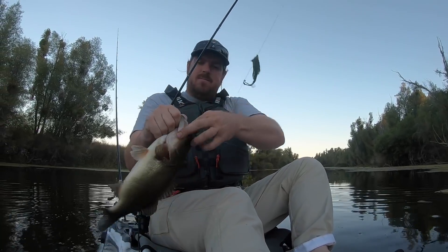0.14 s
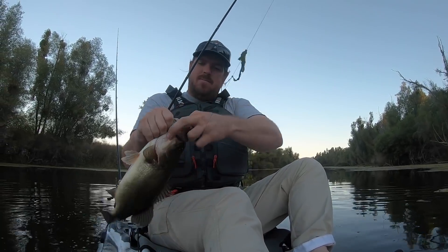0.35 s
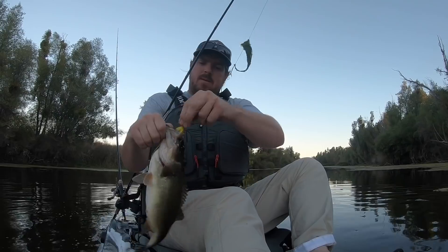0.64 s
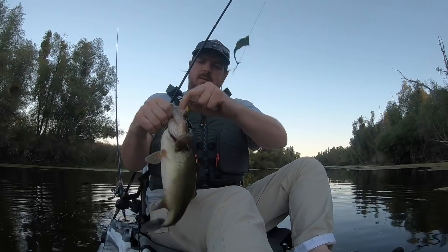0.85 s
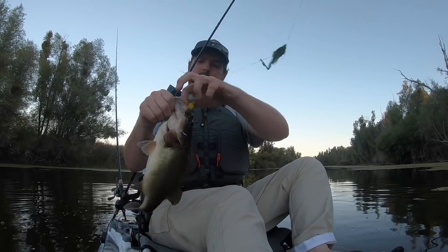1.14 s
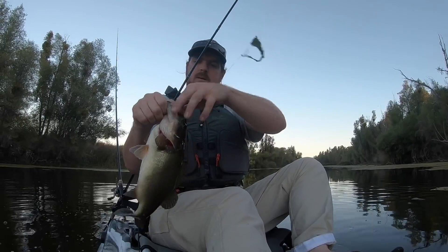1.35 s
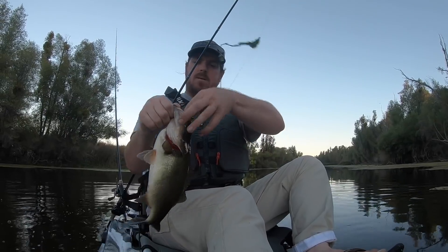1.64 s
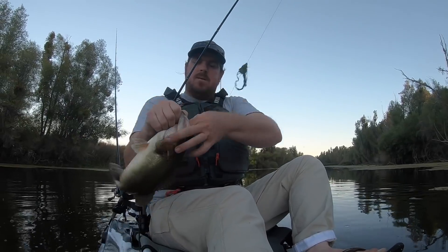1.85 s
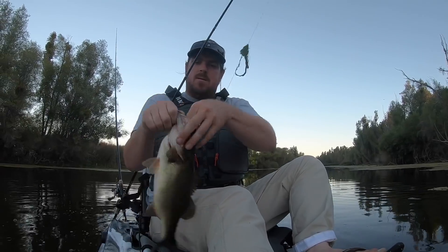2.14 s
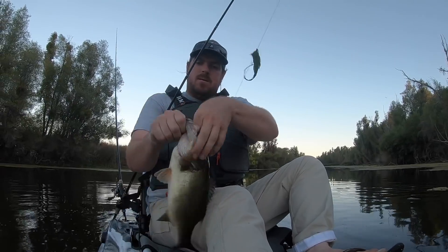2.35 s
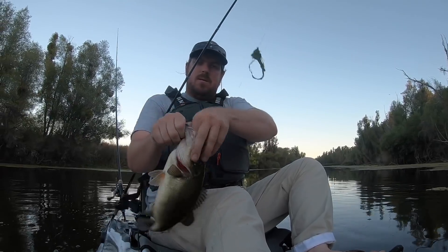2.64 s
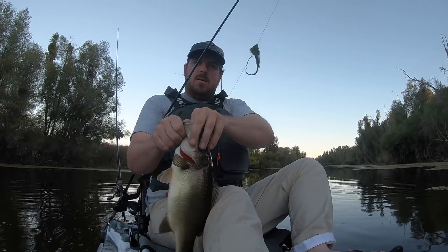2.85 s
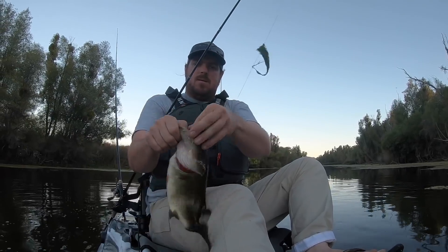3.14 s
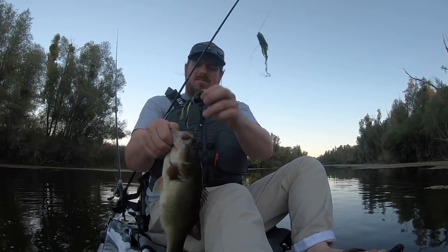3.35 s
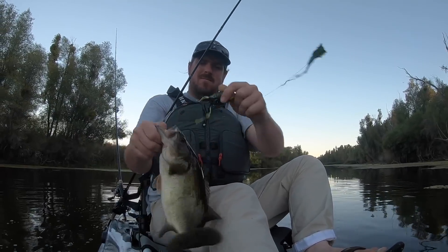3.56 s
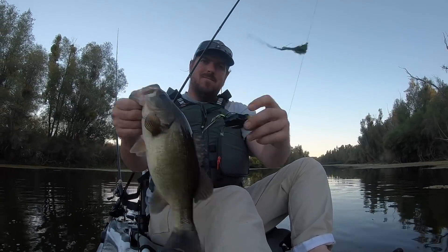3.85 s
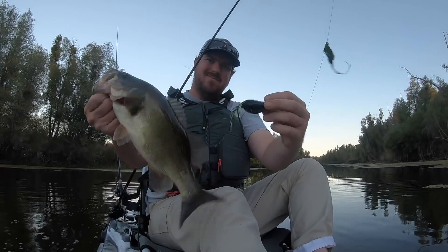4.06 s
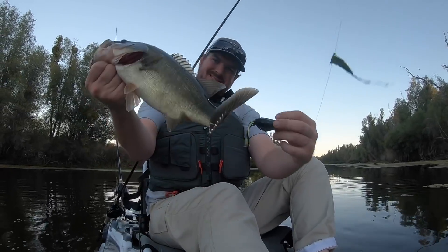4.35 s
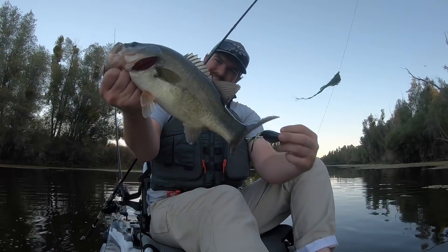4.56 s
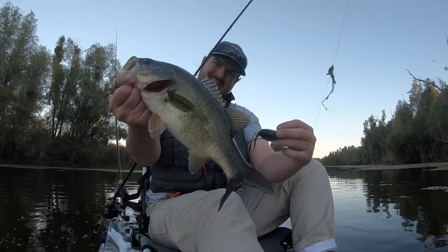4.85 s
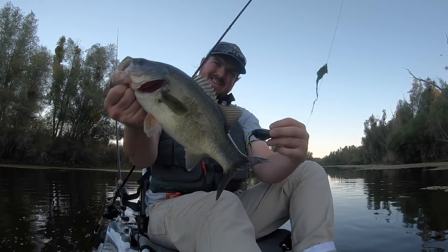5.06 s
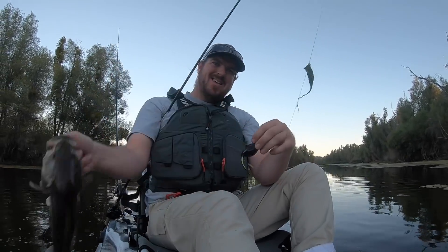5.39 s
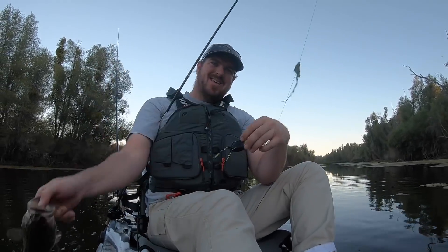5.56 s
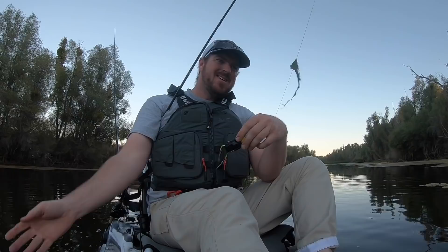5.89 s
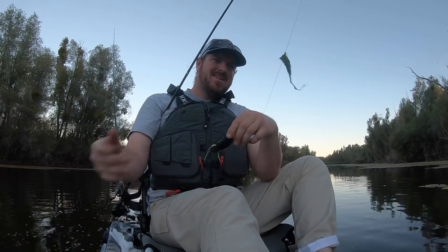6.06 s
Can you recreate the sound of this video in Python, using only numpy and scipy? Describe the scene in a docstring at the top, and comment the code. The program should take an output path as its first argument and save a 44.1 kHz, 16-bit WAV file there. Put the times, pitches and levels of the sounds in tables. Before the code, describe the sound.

On still water, a very low murmur and faint cloth rustle open, with tiny clicks, a brief falling squeak and a thin bird whistle. Then a hard hull knock and judder, scrapes, hollow taps and metallic lure clicks as a fish is unhooked. A calmer stretch with soft bumps and bird calls follows, then another cluster of heavy knocks and a short bubbling splash. Close microphone mounted on the hull, outdoors.

```python
"""A fish is unhooked in a plastic kayak on still water, close to a camera mounted on the hull.
Over a low murmur (coloured noise), faint clicks (noise bursts), cloth and wet hands (tiny slips) come first,
with a falling squeak (harmonics) and a small bird on the bank (gliding sines), which goes on calling.
Scrapes and rattles follow as hook and lure work loose; the hull knocks and judders (ringing modes, stick-slip).
After more knocks and judders the fish is let go with a splash: crackling spray and bubbles of rising pitch."""
import sys
import numpy as np
from scipy import signal
from scipy.fft import rfft, irfft
from scipy.io import wavfile
from scipy.ndimage import uniform_filter1d

SR = 44100
rng = np.random.default_rng(int(sys.argv[2]) if len(sys.argv) > 2 else 0)


def generate_wav(sig):
    """Save sig (samples, or channels by samples) to the path in sys.argv[1] as 16-bit PCM at SR."""
    pcm = np.round(np.clip(np.atleast_2d(sig).T, -1, 1) * 32767).astype(np.int16)
    wavfile.write(sys.argv[1], SR, pcm)


N = 274522
TIME = np.arange(N) / SR

# Spectrum of wet rubbing. Each row: frequency in Hz, density in dB per Hz.
RUB_TONE = [(100, 4), (400, -1.5), (1000, -4), (1450, 3), (2000, -5), (2800, -5), (3700, -1), (4400, -7),
            (5400, -2), (6500, -7), (8000, -18), (10500, -32.5), (14000, -51)]


def amp(db):
    """Decibels to gain."""
    return 10 ** (np.asarray(db) / 20)


def unit(x):
    """Scales to rms 1."""
    return x / np.sqrt(np.mean(x ** 2) + 1e-20)


def read(points, hz):
    """Reads a table on a log-frequency axis."""
    f, value = np.transpose(points)
    return np.interp(np.log(hz + 1), np.log(f + 1), value)


def curves(rows, t=TIME):
    """Joins the rows of a table by straight lines in time."""
    s, *columns = np.transpose(rows)
    return [np.interp(t, s, c) for c in columns]


def add(mix, s, sound):
    """Mixes a sound in at a time in seconds."""
    at = round(s * SR)
    sound = sound[..., max(-at, 0):]
    part = mix[..., max(at, 0):][..., :sound.shape[-1]]
    part += sound[..., :part.shape[-1]]


def pan(x, db):
    """Places a sound by its left-right level difference."""
    return np.array([x * amp(db / 2), x * amp(-db / 2)])


def band(x, hz, kind="low", order=2):
    """Causal low-pass or high-pass."""
    return signal.sosfilt(signal.butter(order, min(hz, SR / 2 - 1), kind, fs=SR, output="sos"), x)


def body_of(x, split_hz=3000):
    """Low part of a stereo pair, filtered both ways for zero phase."""
    forward = band(x, split_hz)
    return band(forward[:, ::-1], split_hz)[:, ::-1]


def colour(x, points, size=4096):
    """Causal (minimum-phase) filter of unit energy with the given spectrum."""
    log_gain = np.log(amp(read(points, abs(np.fft.fftfreq(size, 1 / SR)))))
    taps = np.fft.ifft(np.exp(np.conj(signal.hilbert(log_gain)))).real[:size // 2]
    return signal.fftconvolve(x, taps / np.linalg.norm(taps))[:len(x)]


def ring_modes(modes, t):
    """Sum of decaying sines of alternating sign; each mode: Hz, dB, t60 in s."""
    ring = np.zeros(len(t))
    for k, (hz, db, t60_s) in enumerate(modes):
        ring += (-1) ** k * amp(db - 60 * t / t60_s) * np.sin(2 * np.pi * hz * t)
    return ring


def both_ears(three, same):
    """Mixes one shared and two separate signals into a pair; same is the shared power, 0-1."""
    return np.sqrt(same) * three[0] + np.sqrt(1 - same) * np.array(three[1:])


def grains(crackle_db, per_s):
    """Dense tiny slips of uneven size, local rms near 1."""
    size = amp(crackle_db * np.minimum(rng.exponential(1, N), 4))
    train = size * rng.standard_normal(N) * (rng.random(N) < per_s / SR)
    return train / np.sqrt(abs(uniform_filter1d(train ** 2, size=2205)) + 1e-9)


def rubbing(strokes, tone, crackle_db, per_s, same, side_db):
    """Tiny slips under strokes, each given as (envelope, gain of the body below 3 kHz in dB)."""
    rub = both_ears([colour(grains(crackle_db, per_s), tone) for _ in range(3)], same)
    low = body_of(rub)
    top_level = np.sqrt(sum(push ** 2 for push, _ in strokes))
    body_level = np.sqrt(sum((push * amp(body_db)) ** 2 for push, body_db in strokes))
    return pan(np.ones(1), side_db) * (top_level * (rub - low) + body_level * low)


def echo(x, t60_s, swell_s, tone_hz):
    """A diffuse noise tail that swells, then decays; different in each ear."""
    t = np.arange(SR) / SR
    tail = band(rng.standard_normal((2, SR)), tone_hz)
    tail = tail * amp(-60 * t / t60_s) * (1 - np.exp(-(t / swell_s) ** 2))
    return signal.fftconvolve(x[None], tail / np.linalg.norm(tail[0]), axes=1)[:, :N]


def through_mount(x, phase_rad=2.64):
    """Shaking of the camera drives its two ports in nearly opposite directions."""
    # Each row: frequency in Hz, left port against right in dB.
    mount = [(50, -9.5), (100, -14), (210, -9), (300, -9.5), (450, -3.5), (800, 1), (1200, 2.5), (2000, 7)]
    hz = np.fft.rfftfreq(N, 1 / SR)
    left = irfft(rfft(x) * amp(read(mount, hz)) * np.exp(1j * phase_rad), N)
    return np.array([left, x])


def air(level_db=-63, same=0.26):
    """The quiet of open water: a far, low murmur of wind under faint, steady hiss."""
    # Spectrum. Each row: frequency in Hz, density in dB per Hz.
    air_tone = [(25, -24), (60, -0.5), (95, -49.5), (130, 0), (175, 4), (260, -1.5), (400, -11.5),
                (570, -21), (760, -9), (1100, -20), (2300, -22.5), (5200, -20.5), (8000, -32), (14000, -42)]
    return amp(level_db) * both_ears([colour(v, air_tone) for v in rng.standard_normal((3, N))], same)


def bird(direct_db=-0.5, side_db=1, waver=0.0093, waver_hz=400):
    """A thin whistle lifts, then falls; stands of trees blur its loudest part into a swelling wash."""
    # Each row: start in s, base level in dB, pitch factor, length factor, echo swell in s, base echo in dB.
    calls = [(.859, -49.5, 1.005, 1, .085, 0), (1.328, -67, .68, .45, .03, -8),
             (1.874, -61, .71, .45, .03, -8), (2.598, -61, .99, 1.05, .05, -4),
             (3.884, -63, .87, .35, .03, -8), (4.522, -56.5, .985, 1.05, .03, 0),
             (5.762, -62, .99, 1, .02, -5)]
    # One call before scaling. Each row: time from its start in s, pitch in Hz, level in dB.
    chirp = [(0, 4650, -20), (.009, 5000, -9), (.017, 5270, 0), (.026, 5060, 0), (.039, 4560, -4),
             (.049, 4150, -13), (.06, 3600, -18), (.066, 3350, -26)]
    bank_db, bank_t60_s, blur_hz, stands = 1.5, 0.55, 230, 3
    out = np.zeros((2, N))
    for s, db, pitch, length, swell_s, echo_db in calls:
        hz, shape_db = curves(chirp, np.arange(0, chirp[-1][0], 1 / (SR * length)))
        hz = hz * (1 + waver * unit(band(rng.standard_normal(len(hz)), waver_hz)))
        call = amp(db + shape_db) * np.sin(2 * np.pi * np.cumsum(hz * pitch) / SR)
        add(out, s, amp(direct_db) * pan(call, side_db))
        for blur in band(rng.standard_normal((stands, len(call))), blur_hz, order=4):
            scattered = call * amp(shape_db / 2) * unit(blur) / np.sqrt(stands)
            add(out, s, amp(bank_db + echo_db) * echo(scattered, bank_t60_s, swell_s, tone_hz=7930))
    return out


def cloth():
    """Sleeves and vest brush: each arm movement speeds up and slows down, and the hiss follows."""
    # Each row: time of the fastest motion in s, level in dB, half-length in s, body below 3 kHz in dB.
    sweeps = [(0.224, -77, 0.031, 15), (0.396, -67, 0.027, -5), (0.551, -61, 0.018, -2.5),
              (0.678, -56.5, 0.052, -1), (0.855, -68, 0.16, 5), (1.38, -70.5, 0.15, 4),
              (2.039, -79.5, 0.24, 5.5), (2.475, -73, 0.43, 0), (3.069, -61, 0.055, 2.5),
              (3.636, -63, 0.041, -16), (4.306, -63.5, 0.19, -3), (5.248, -57.5, 0.022, -2.5),
              (5.315, -57.5, 0.022, -3), (5.404, -56, 0.079, 0), (5.98, -80.5, 0.085, 18)]
    # Spectrum. Each row: frequency in Hz, density in dB per Hz.
    cloth_tone = [(100, 2.5), (250, 15), (450, 2.5), (1000, -3), (1400, 0), (1770, 3), (2100, -8),
                  (3200, -5), (3830, 3), (4400, -3), (5100, 1), (5600, 5), (6400, -6), (7200, -13),
                  (8500, -24), (14000, -45)]
    strokes = []
    for s, db, half_s, body_db in sweeps:
        strokes.append((amp(db) * np.exp(-((TIME - s) / half_s) ** 2 / 2), body_db))
    return rubbing(strokes, cloth_tone, crackle_db=-1.0, per_s=5000, same=1.0, side_db=1.0)


def squeak(rough=0.5, rough_hz=83, jitter=0.03, jitter_hz=100):
    """Something wet slides and squeaks; its harmonics fall through a fixed body resonance."""
    # Each row: time in s, pitch in Hz, level in dB.
    glide = [(.696, 500, -68), (.705, 480, -55), (.717, 460, -49), (.731, 410, -56), (.748, 372, -58),
             (.76, 345, -69), (.775, 325, -74)]
    # The body that colours it. Each row: frequency in Hz, gain in dB.
    body = [(350, -6), (470, -3), (600, -5), (760, 0), (950, 0), (1120, -12), (1380, 3), (1620, -2),
            (1900, -18), (2300, -30), (2600, -36)]
    hz, db = curves(glide)
    wobble = 1 + jitter * unit(band(rng.standard_normal(N), jitter_hz))
    turn = 2 * np.pi * np.cumsum(hz * wobble) / SR
    tone = sum(amp(read(body, k * hz)) * np.sin(k * turn) for k in range(1, 6))
    sounding = (TIME > glide[0][0]) & (TIME < glide[-1][0])
    return tone * amp(db) * sounding * (1 + rough * unit(band(rng.standard_normal(N), rough_hz)))


def hands(level_db=-71.5, body_db=-11, end_s=5.1, letting_go_s=0.086):
    """Wet fingers crackle faintly on the fish until it is lowered over the side."""
    held = np.clip((end_s - TIME) / letting_go_s, 0, 1)
    strokes = [(amp(level_db) * held, body_db)]
    return rubbing(strokes, RUB_TONE, crackle_db=5, per_s=2000, same=0.43, side_db=2.5)


def hook(rise_s=0.01, release_s=0.016, uneven_db=2.0, uneven_hz=40):
    """Hook and wet fingers scrape in the fish's mouth: quick bite, uneven pressure, light drag after."""
    # Each row: start in s, level in dB, length in s, body below 3 kHz in dB.
    scrapes = [(1.913, -50, 0.04, -2.5), (2.276, -56.5, 0.0094, 0), (2.416, -54, 0.06, -2.5),
               (2.662, -62, 0.034, 1), (2.829, -49.5, 0.036, -3.5), (2.932, -59.5, 0.07, -7),
               (3.017, -59, 0.034, 2.5), (3.259, -57, 0.045, 1.5), (3.337, -47, 0.12, -6.5),
               (3.528, -58, 0.092, -11.5)]
    drag_db, drag_release_s = -13, 0.18
    pressure = amp(uneven_db * unit(band(rng.standard_normal(N), uneven_hz)))
    strokes = []
    for s, db, length_s, body_db in scrapes:
        bite = np.clip((TIME - s) / rise_s, 0, 1)
        after = np.maximum(TIME - s - length_s, 0)
        drag = amp(drag_db) * np.exp(-after / drag_release_s)
        release = np.maximum(np.exp(-after / release_s), drag)
        strokes.append((amp(db) * pressure * bite * release, body_db))
    return rubbing(strokes, RUB_TONE, crackle_db=3.4, per_s=4000, same=0.34, side_db=5)


def splash(lift_db=6, same=0.98, bubble_s=0.0022, bend_per_s=8):
    """The fish kicks off: drops and spray crackle, and a few bubbles ring with a rising pitch."""
    # Spray. Each row: time in s, level in dB before the lift.
    spray = [(6.13, -60.5), (6.146, -60.5), (6.157, -59), (6.184, -62.5), (6.202, -51), (6.225, -57)]
    # Spray spectrum. Each row: frequency in Hz, density in dB per Hz.
    spray_tone = [(60, 11.5), (200, 14.5), (450, 1), (650, 5), (1000, 5.5), (2000, -3.5), (3000, -6),
                  (5000, -13), (7000, -8), (10000, -29), (14500, -42)]
    # Each row: start in s, level in dB, starting pitch in Hz.
    bubbles = [(6.158, -51, 1620), (6.188, -41.5, 1130), (6.201, -56, 850), (6.208, -44, 2000),
               (6.209, -35, 610), (6.216, -43, 2060)]
    water = both_ears([colour(grains(crackle_db=2.5, per_s=7000), spray_tone) for _ in range(3)], same)
    out = water * amp(curves(spray)[0] + lift_db) * (TIME > spray[0][0])
    t = np.arange(2048) / SR
    for s, db, hz in bubbles:
        turn = 2 * np.pi * hz * t * (1 + bend_per_s * t)  # pitch rises at twice the bend
        add(out, s, pan(amp(db) * np.exp(-t / bubble_s) * np.sin(turn), 0))
    return out


def judder(rough=0.055, wobble=0.085, uneven_hz=110, second_db=-24, third_db=-33):
    """As weight shifts, uneven stick-slip cycles swell in the hull, ring off and leave the deck swaying."""
    # Each row: start in s, level in dB, length of the swell in s, mean slip rate in Hz.
    judders = [(2.141, -10, 0.033, 233), (2.164, -17, 0.072, 284.9), (5.326, -26, 0.033, 207),
               (5.351, -27.5, 0.061, 244.5), (5.441, -14, 0.049, 270.4), (5.473, -26.5, 0.048, 300.4),
               (5.514, -24, 0.051, 265.3), (5.632, -29.5, 0.072, 269.4)]
    skew = 0.55  # under 1: swells faster than it dies
    ring_db, ring_s = -12, 0.028
    # sway level follows only a share of the judder's level
    sway_hz, sway_db, sway_follow, sway_rise_s = 97.5, -23, 0.18, 0.03
    t, out = np.arange(SR // 2) / SR, np.zeros(N)
    for s, db, length_s, hz in judders:
        drift, grip = (unit(band(v, uneven_hz)) for v in rng.standard_normal((2, len(t))))
        clock = 2 * np.pi * np.cumsum(1 + wobble * drift) / SR
        turn = hz * clock
        slips = np.sin(turn) + amp(second_db) * np.sin(2 * turn) + amp(third_db) * np.sin(3 * turn)
        slips = slips * (1 + rough * grip)
        swell = np.sin(np.pi * np.minimum(t / length_s, 1) ** skew) ** 2
        since_half = t - length_s / 2
        swell = np.maximum(swell, (since_half > 0) * amp(ring_db) * np.exp(-since_half / ring_s))
        sway = np.sin(sway_hz * clock) * t / sway_rise_s * np.exp(1 - t / sway_rise_s)
        add(out, s, amp(db) * unit(slips) * swell + amp(sway_db + sway_follow * db) * sway)
    return through_mount(out)


def hull(scuff=0.91, boom_hz=130):
    """A blow and the scuff after it ring the hull's modes; soft blows reach mainly the low ones."""
    # Each row: start in s, level in dB, hardness in Hz, boom below 130 Hz in dB, scuff decay in s,
    # share carried by the mount 0-1.
    knocks = [(.771, -48.5, 300, 4.5, 0.027, 0), (0.811, -51, 110, 14, 0.086, 0),
              (0.982, -55.5, 260, -28, 0.063, 0.17), (1.924, -41, 187, -7, 0.07, 1),
              (2.041, -36.5, 228, -3.5, 0.28, 1), (2.137, -24.5, 1100, 9, 0.011, 0.85),
              (2.146, -16, 426, -8.5, 0.033, 0.84), (2.197, -19, 155, 2, 0.042, 0.95),
              (2.683, -41, 380, -34, 0.0114, 0.78), (2.846, -45.5, 250, -32, 0.15, 1),
              (3.317, -46.5, 450, -23, 0.004, 0.3), (3.353, -48, 260, -26, 0.0028, 0.13),
              (3.458, -47.5, 300, 5.5, 0.0016, 1), (3.849, -53, 322, 3.5, 0.068, 0.3),
              (3.974, -43, 307, 4, 0.0046, 0.85), (4.165, -42, 308, -2, 0.023, 0.39),
              (4.19, -42, 128, 4.5, 0.15, 0.31), (4.331, -50, 150, 4.5, 0.074, 0.36),
              (4.44, -59, 170, 2, 0.029, 0.33), (5.319, -25.5, 436, 1.5, 0.034, 0.15),
              (5.386, -19.5, 113, 4, 0.12, 1), (5.438, -26.5, 647, -2, 0.019, 1),
              (5.529, -31, 121, -1.5, 0.091, 0.96), (5.908, -44, 248, -13, 0.14, 0.1),
              (6.15, -38, 385, -33, 0.0084, 0.37), (6.169, -37, 300, -13, 0.0042, 0.15),
              (6.187, -41, 590, -13, 0.012, 0.15)]
    # Each row: frequency in Hz, level in dB.
    hull_modes = [(53, -11.5), (97, -7.5), (125, -9.5), (167, -0.5), (210, 2), (272, -1.5), (315, -1),
                  (365, -5.5), (415, -5.5), (465, -7.5), (514, -7), (570, -13), (650, -9), (765, -3.5),
                  (818, 1), (885, -8.5), (985, -9.5), (1185, 1), (1270, -2.5), (1480, -14), (1650, -19)]
    t = np.arange(SR * 3 // 4) / SR
    shaken, aired = np.zeros(N), np.zeros(N)
    mode_hz, mode_db = np.transpose(hull_modes)[:, :, None]
    t60_s = 0.048 * (1000 / mode_hz) ** 0.65
    sign = (-1) ** np.arange(len(hull_modes))[:, None]
    modes = sign * amp(mode_db - 60 * t / t60_s) * np.sin(2 * np.pi * mode_hz * t)
    for s, db, hard_hz, boom_db, scuff_s, share in knocks:
        boom = amp(boom_db * (mode_hz < boom_hz))
        ring = (modes * boom / (1 + (mode_hz / hard_hz) ** 2)).sum(0)
        force = rng.standard_normal(len(t)) * np.exp(-t / scuff_s)
        force *= scuff * np.sqrt(scuff_s / 0.0081) / np.linalg.norm(force)  # long contacts are mostly scuff
        force[0] += 1  # the blow
        knock = band(signal.fftconvolve(force, ring)[:len(t)], 2 * hard_hz)
        knock *= amp(db) / np.sqrt(uniform_filter1d(knock ** 2, size=882).max())  # peak 20 ms rms
        add(shaken, s, share * knock)
        add(aired, s, (1 - share) * knock)
    return through_mount(shaken) + aired


def tackle(contact_hz=3500):
    """The jerked line knocks the tackle on the boat: a hollow knock with a short, woody clack on top."""
    # Each row: start in s, level in dB.
    taps = [(2.518, -19.5), (2.705, -10.5)]
    # The tackle and its holder. Each row: frequency in Hz, level in dB, t60 in s.
    tackle_modes = [(97, -15.5, 0.23), (203.6, 1, 0.11), (319, -25.5, 0.13), (380, -11.5, 0.052),
                    (598, -2, 0.018), (860, -9, 0.041), (995.5, -12.5, 0.065), (1097, -13.5, 0.063),
                    (1294, -15.5, 0.04), (1480, -20, 0.029), (1780, -17, .024), (2037, -17.5, 0.03)]
    out = np.zeros(N)
    knock = band(ring_modes(tackle_modes, np.arange(SR // 4) / SR), contact_hz)
    for s, db in taps:
        add(out, s, amp(db) * knock)
    return through_mount(out)


def rattle(contacts_per_s=2500):
    """The loose lure rattles: a flurry of tiny contacts swells and dies, ringing lure and hooks."""
    # Each row: start in s, level in dB, length in s, left-right in dB.
    rattles = [(1.931, -41.5, 0.031, 2), (2.405, -51, 0.018, 9), (2.645, -64.5, 0.013, 21),
               (2.696, -52, 0.0038, 8)]
    # The lure and its hooks. Each row: frequency in Hz, level in dB, t60 in s.
    lure_modes = [(1630, -14, .05), (3520, -12.5, 0.062), (3740, -14, 0.062), (4870, -5, 0.043),
                  (5250, -2, 0.043), (5980, -10.5, 0.027), (6980, -26, .025)]
    t, out = np.arange(SR // 6) / SR, np.zeros((2, N))
    ring = ring_modes(lure_modes, t)
    for s, db, length_s, side_db in rattles:
        chance, size = rng.random((2, len(t)))
        swell = np.sin(np.pi * np.minimum(t / length_s, 1))
        contacts = (chance < contacts_per_s / SR) * (size - 0.5) * swell
        jingle = band(signal.fftconvolve(contacts, ring)[:len(t)], 9000)
        peak_rms = np.sqrt(uniform_filter1d(jingle ** 2, size=441).max() + 1e-20)
        add(out, s, pan(amp(db) * jingle / peak_rms, side_db))
    return out


def lure(snap=2, peak_db=3, peak_q=3, same=0.9, deck_db=-24, deck_s=0.0067, tail_db=-26):
    """Hook, lure and stray drops: a snap and pitched chatter; thin clicks leave the hook's wire ringing."""
    # Each row: start in s, level in dB, body below 3 kHz in dB, chatter decay in s, left-right in dB,
    # strongest pitch in Hz.
    clicks = [(0.014, -61.5, -31, 0.0076, -12, 4350), (0.128, -60.5, -26.5, 0.0041, 0, 4680),
              (0.3351, -57.5, -5, 0.0033, -9, 4840), (0.851, -44, 1.5, 0.0019, 0.5, 4970),
              (1.9219, -29.5, -7, 0.0017, 2.5, 2870), (1.9422, -38, -21, 0.0017, -1, 5300),
              (2.298, -54.5, -22, 0.003, 11, 5900), (2.3689, -47.5, 10, 0.002, 7.5, 1306),
              (2.413, -42, -13, 0.0011, 15.5, 4800), (2.518, -39.5, 11, 0.0028, 9, 5100),
              (2.675, -60, -30, 0.00087, 18, 5300), (2.705, -24.5, -9, 0.0022, 7.5, 6600),
              (2.8495, -41.5, 2.5, 0.0027, 14, 3750), (2.944, -61, -18, 0.0022, 24, 5700),
              (2.969, -56, -16, .001, 20, 5900), (3.051, -52, 3, 0.0025, 19, 3500),
              (3.059, -49.5, 17, 0.0016, 21, 1430), (3.077, -37, -0.5, 0.0039, 10.5, 5200),
              (3.252, -56.5, 0, 0.006, 8, 1460), (3.321, -46.5, -3, 0.0018, 17, 870),
              (3.3287, -38, -8, 0.0044, 2.5, 3320), (3.3604, -44, -18, 0.0014, 1, 5140),
              (3.372, -43, -13, 0.0026, 1, 6600), (3.416, -48, -1, .003, 4, 4200),
              (3.425, -41.5, -13, .001, 1, 8200), (3.486, -55, -16, 0.0015, 3, 5330),
              (3.4573, -39, -7, 0.0028, 5.5, 5640), (3.526, -50, -24, 0.00075, -1, 5500),
              (3.532, -53, -25, .0006, 0, 5300), (3.5427, -38, -19, 0.0054, 7.5, 6300),
              (4.251, -60, -24, 0.0015, 1, 6550), (4.818, -65, -18, .001, 4, 5300),
              (4.845, -63.5, -14, 0.0034, -3, 4900), (5.319, -47.5, 23, 0.0049, 1, 1650),
              (6.1368, -57.5, -8, 0.0012, 4, 800)]
    # Spectrum. Each row: frequency in Hz, density in dB per Hz.
    click_tone = [(30, -53), (200, 4), (600, -2), (1100, 2.5), (1500, 7), (2100, 3), (2700, -7),
                  (3650, -3.5), (4300, -4), (5300, 2.5), (6200, -4.5), (7500, -18), (10000, -32.5),
                  (14000, -61.5), (17000, -102)]
    wire_hz, wire_t60_s, wire_db = 5300, 0.0074, -17
    t, out = np.arange(4096) / SR, np.zeros((2, N))
    wire = band(np.sin(2 * np.pi * wire_hz * t) * amp(-60 * t / wire_t60_s), 7000, order=6)
    for s, db, body_db, ring_s, side_db, hz in clicks:
        decay = np.exp(-t / ring_s) + amp(deck_db) * np.exp(-t / deck_s)  # arms and deck scatter it
        force = both_ears(rng.standard_normal((3, len(t))), same) * decay
        force[:, 0] = snap * np.sqrt(ring_s * SR) / 4
        click = np.array([colour(ear, click_tone) for ear in force])
        click = click + (amp(body_db) - 1) * body_of(click)
        click = click + amp(peak_db) * signal.lfilter(*signal.iirpeak(hz, peak_q, fs=SR), click)
        click = click / np.sqrt(np.mean(click[:, :128] ** 2))  # onset rms 1
        click = click + amp(wire_db - body_db) * wire
        add(out, s, amp(db) * pan(np.ones(1), side_db) * band(click, 13000, order=3))
    return out + amp(tail_db) * echo(out.mean(0), t60_s=0.2, swell_s=0.0074, tone_hz=6300)


def scene():
    """Everything in and around the boat."""
    surroundings = air() + bird()
    handling = cloth() + squeak() + hands() + hook() + splash()
    boat = judder() + hull() + tackle()
    return surroundings + handling + boat + rattle() + lure()


def record(dry, open_db=-45, steep=4, close_db_per_s=32, duck_above_db=-40, duck_share=0.15, duck_hz=2):
    """The camera narrows quiet sound to near mono, slowly turns down loud sound and limits the band."""
    mid, side = (dry[0] + dry[1]) / 2, (dry[0] - dry[1]) / 2
    power_db = 10 * np.log10(abs(uniform_filter1d(mid ** 2, size=1764)) + 1e-12)
    # held level jumps up at once and falls at a fixed rate
    fall_db = TIME * close_db_per_s
    held_db = np.maximum.accumulate(power_db + fall_db) - fall_db
    side = side * amp(np.clip(steep * (held_db - open_db), -45, 0))
    duck_db = duck_share * band(np.maximum(held_db - duck_above_db, 0), duck_hz, order=1)
    ports = band(np.array([mid + side, mid - side]) * amp(-duck_db), 32, "high")
    low_pass = signal.firwin(255, 15000, window=("kaiser", 8), fs=SR)
    return signal.oaconvolve(ports, low_pass[None], "same")


dry = scene()
out = record(dry)
generate_wav(out)
```